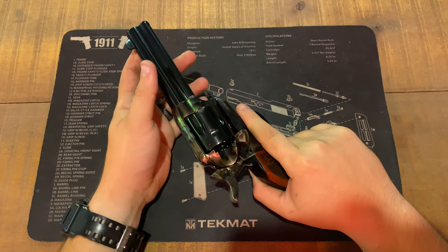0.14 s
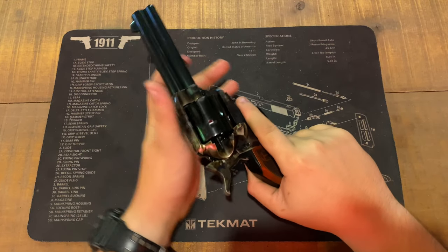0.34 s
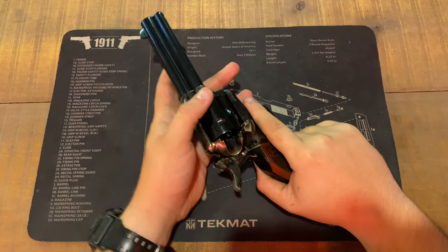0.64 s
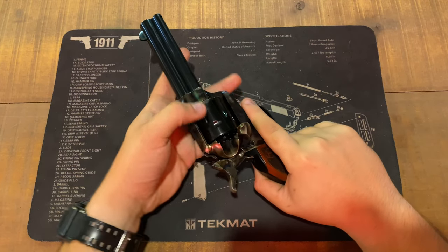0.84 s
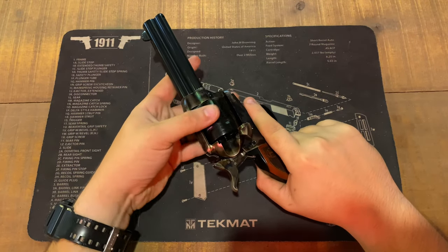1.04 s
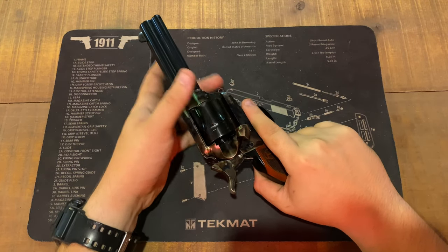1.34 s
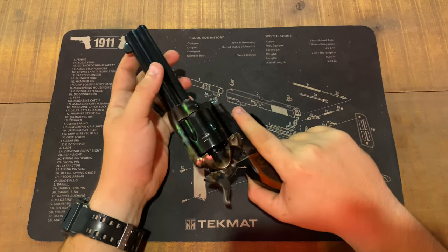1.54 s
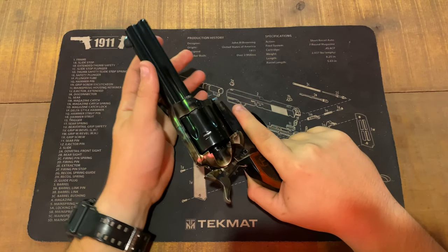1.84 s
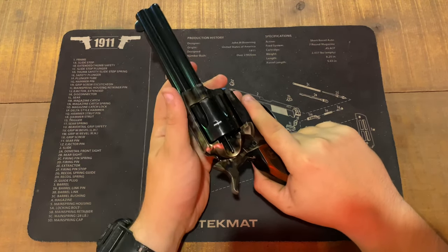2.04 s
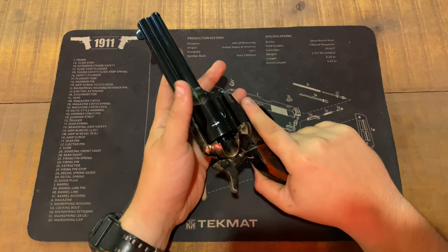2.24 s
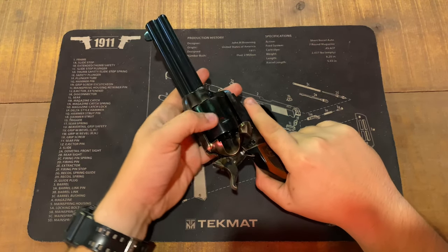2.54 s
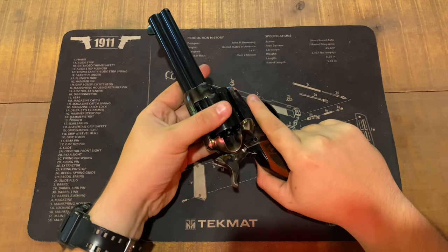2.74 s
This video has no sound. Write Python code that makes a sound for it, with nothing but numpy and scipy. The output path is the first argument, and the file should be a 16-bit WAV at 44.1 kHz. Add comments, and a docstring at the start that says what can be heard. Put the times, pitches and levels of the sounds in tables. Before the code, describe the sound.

Crisp metallic revolver clicks, close stereo microphone in a small room: faint scrape and ticks, hard ringing clack, a pause, one sharp snap, then the same again, with soft hand rubs and dull knocks over low rumble.

```python
"""A low room rumble comes first; over it a revolver is worked by hand above a table, twice in a row.
The cylinder scrapes free and swings out with light ticks, is pushed home with a ringing clack,
then is turned until its stop snaps into a notch. Hands rub the gun and take up dull knocks.
Contacts are coloured noise bursts, ringing steel is decaying sines, scrapes and rubs are shaped noise;
a small room echoes the gun."""
import sys
import numpy as np
from scipy import signal
from scipy.fft import rfft, irfft
from scipy.io import wavfile
from scipy.ndimage import uniform_filter1d

SR = 44100
rng = np.random.default_rng(int(sys.argv[2]) if len(sys.argv) > 2 else 0)


def to_wav(s):
    """Save 16-bit WAV."""
    ch = np.atleast_2d(s).T  # columns
    pcm = np.round(np.clip(ch, -1, 1) * 32767)  # PCM
    wavfile.write(sys.argv[1], SR, pcm.astype(np.int16))


N = 127890

# room rumble: (frequency [Hz], relative level [dB])
FLOOR_COLOUR = [(20, -12.5), (65, 3), (98, 0.5), (130, -11), (360, -15), (520, -27.5), (2000, -45.5),
                (6200, -35), (8000, -48), (10000, -48.5), (12000, -75)]
FLOOR_DB, FLOOR_PAN_DB = -59, [[4.5], [-2]]  # pan: left, right

# steel sliding on steel, one curve per scrape: (time [s], level [dB])
SCRAPE_CURVES = [
    [(.11, -105), (.145, -61), (.245, -54), (.275, -47), (.31, -46), (.325, -71)],
    [(.553, -55.5), (.56, -37), (.583, -40.5), (.62, -52.5), (.655, -47)],
    [(1.735, -66.5), (1.865, -50.5), (1.88, -45), (1.915, -34.5), (1.935, -67.5)],
    [(2.12, -46), (2.137, -40), (2.158, -41), (2.166, -33.5), (2.187, -36)],
]
# scrape spectrum: (frequency [Hz], relative level [dB])
SCRAPE_COLOUR = [(300, -31), (2650, -16), (5500, -10.5), (6200, -3), (8090, -18), (9490, -1), (11300, -22),
                 (12700, -58.5), (13600, -28), (16000, -40.5)]
GRAINS_PER_S = 3200
PATCH_HZ, PATCH_S, PATCH_DB = 601.4, 0.02, 4  # approximate width and life, rms depth of passing resonances

# light contacts of latch and crane: (time [s], level [dB], ping of the small parts re level [dB])
TICKS = [(0.141, -43.5, -0.5), (0.165, -40.5, -3), (0.315, -23.5, -8.5), (.404, -28.5, 5.5),
         (0.4058, -29, 12), (0.4104, -22, 5.5), (0.512, -35, -6.5), (0.5559, -30, 1), (0.586, -26.5, 2),
         (1.7723, -42.5, -18), (1.929, -25.5, -12.5), (1.9332, -17.5, 7), (1.9367, -18, 4.5),
         (2.0861, -29, 12), (2.121, -34.5, -10.5), (2.135, -32.5, 12.5), (2.1624, -30.5, 4)]
# tick spectrum: (frequency [Hz], relative level [dB])
TICK_COLOUR = [(800, -15.5), (2100, -8.5), (4700, -5.5), (6200, 0.5), (8000, -8.5), (10500, -5),
               (12500, -40.5), (14500, -26), (16500, -44.5)]
# ping spectrum of pins and springs: (frequency [Hz], relative level [dB])
PING_COLOUR = [(7000, -38), (8700, -12.5), (9250, -2.5), (9650, 6.5), (10000, -11), (12000, -45.5)]
# dull modes of the frame: (frequency [Hz], level [dB], T60 [s])
FRAME_MODES = [(1252, -7.5, 0.0068), (2578, 4.5, 0.025), (3212, -4.5, 0.031)]
FRAME_TICK_DB = -21  # re tick level

# the latch slips free and rings: (time [s], level [dB])
LATCH_RINGS = [(0.163, -41.5), (0.555, -35), (2.134, -32.5)]
LATCH_HZ, LATCH_T60_S = 6383, 0.054

# skin rubbing on the gun: (time [s], nominal length [s], level [dB], pitch of the cupped hand [Hz])
RUBS = [(0.265, 0.13, -44.5, 356.4), (0.409, 0.015, -41.5, 385), (0.595, 0.086, -46, 355),
        (1.888, 0.15, -52, 340), (2.082, .05, -54.5, 400), (2.358, 0.14, -44.5, 330)]
# rub spectrum: (frequency [Hz], relative level [dB])
RUB_COLOUR = [(60, -35), (160, -2), (340, -3.5), (600, -18), (2500, -38), (16000, -72.5)]
# rub balance: rows left, right; (gain [dB])
RUB_PAN_DB = [
    [1],
    [-1.5],
]
RUB_LUMP_S, RUB_LUMP_DB = 0.013, 5.5
RUB_PEAK_SHARE = 0.25  # peak time as a share of length
HOLLOW_WIDTH_HZ, HOLLOW_DB = 32, 2.5

# dull knocks through hands and table, before balance: (time [s], knock [dB], boom [dB])
KNOCKS = [(.29, -47.5, -35.5), (0.404, -45.5, -46.5), (0.655, -35, -41), (1.1, -46.5, -55.5),
          (1.94, -39.5, -35), (2.185, -37, -44)]
# knock balance: rows left, right; (gain [dB])
KNOCK_PAN_DB = [
    [5],
    [-7.5],
]
KNOCK_HZ, KNOCK_END_HZ, KNOCK_SAG_S, KNOCK_PEAK_S = 218.9, 50.5, 0.018, 0.027
KNOCK_ROUGH = 0.35  # share of noise
BOOM_HZ, BOOM_RISE_S, BOOM_T60_S = 96.1, 0.033, 0.54

# the cylinder slams home and chatters: (time [s], level [dB])
SLAMS = [(0.6555, -16.5), (0.6596, -8.5), (.662, -17.5), (2.185, -15), (2.1867, -6.5), (2.194, -21)]
# slam spectrum: (frequency [Hz], relative level [dB])
SLAM_COLOUR = [(300, -29), (1870, -20), (2520, -10), (3770, -16), (6140, -7), (7380, -6.5), (7890, -16.5),
               (9200, 2.5), (10800, -4.5), (11800, -41.5), (15400, -22), (16500, -71)]
# the frame clanks: (time [s], level re FRAME_MODES [dB])
CLANKS = [(.657, -33), (1.7692, -48), (2.1875, -28)]
# hardest contact of each closing: (time [s])
CLOSINGS_S = [.6595, 2.1873]
# cylinder modes: (frequency [Hz], level at first closing [dB], at second [dB], T60 [s])
CYLINDER_MODES = [(4950, -57.5, -38.5, 0.47), (5960, -30.5, -37, 0.11), (7350, -39.5, -28, 0.13),
                  (8670, -20.5, -17.5, 0.039), (8620, -42, -41, 0.24), (10100, -40, -40.5, 0.57),
                  (10640, -41.5, -45.5, 0.42), (13240, -58.5, -38, 0.099), (15030, -47, -49.5, .17)]

# the cylinder stop snaps in and bounces: (time [s], level [dB])
SNAPS = [(1.0869, -7), (1.0893, -10.5), (2.5828, -5.5), (2.592, -18)]
# snap spectrum: (frequency [Hz], relative level [dB])
SNAP_COLOUR = [(300, -34), (1400, -29.5), (2300, -21.5), (3350, -12.5), (4400, -15.5), (5000, -3.5),
               (5850, -1.5), (7800, -10.5), (9400, 5), (10500, -5.5), (12500, -33.5), (14800, -10.5),
               (16500, -32)]
# cylinder stop and its spring: (frequency [Hz], relative level [dB], T60 [s])
STOP_MODES = [(900, -19.5, 0.012), (1956, -18.5, 0.023), (2765, -5.5, 0.026), (5070, -6.5, 0.12),
              (5276, -17, 0.19), (5750, -13, 0.22), (5895, -13.5, 0.24), (6780, -12.5, 0.32),
              (9100, -6.5, .08), (9730, -7, 0.25)]
STOP_DB = -18  # re snap level

RISE_S = 0.00043  # all cracks and rings
TICK_DECAY_S, PING_DECAY_S, SLAM_DECAY_S, SNAP_DECAY_S = 0.0013, 0.00094, 0.0027, 0.0018
WAVER_HZ, WAVER_S = 26.06, 0.0068  # rms depth and pace of the waver in a ring
LIKENESS = 0.73  # left-right correlation of noise
RIGHT_LATE_S = 0.000204

# decay of the room: (frequency [Hz], T60 [s])
ROOM_T60 = [(300, 0.5), (6000, 0.55), (10000, 0.47), (15000, 0.18)]
# tail spectrum: (frequency [Hz], relative level [dB])
ROOM_COLOUR = [(200, 9.5), (1500, 1.5), (3500, 2), (6000, 4), (9500, -4), (11000, -1), (12500, -25),
               (16000, -5)]
ROOM_DB, EARLY_DB = -12.5, [[-3], [-4]]  # early: left, right
EARLY_DECAY_S, FIRST_ECHO_S = 0.013, 0.0016
EDGE_HZ = 16800


def amp(db):
    """Decibels to gain."""
    return 10 ** (np.asarray(db) / 20)


def unit(x):
    """Scales to rms 1."""
    return x / np.sqrt(np.mean(x ** 2) + 1e-20)


def read(points, hz):
    """Reads a table on a log-frequency axis."""
    f, value = np.transpose(points)
    return np.interp(np.log(hz + 1), np.log(f + 1), value)


def add(mix, start_s, sound):
    """Adds a sound to the mix at a time, cut at the end of the mix."""
    part = mix[:, max(round(start_s * SR), 0):][:, :sound.shape[-1]]
    part += sound[..., :part.shape[1]]


def colour(x, points, size=4096):
    """Minimum-phase filter of unit energy with the given spectrum."""
    gain_db = np.maximum(read(points, abs(np.fft.fftfreq(size, 1 / SR))), -100)
    log_gain = np.log(amp(gain_db))
    taps = np.fft.ifft(np.exp(np.conj(signal.hilbert(log_gain)))).real[:size // 2]
    taps /= np.linalg.norm(taps)
    return signal.oaconvolve(x, taps[None], axes=1)[:, :x.shape[1]]


def pair(size):
    """Partly alike left and right noise, each drawn with a flat spectrum."""
    a, b = irfft(np.exp(2j * np.pi * rng.random((2, size // 2 + 1))), size)
    return unit(np.array([a, LIKENESS * a + np.sqrt(1 - LIKENESS ** 2) * b]))


def crack(decay_s, size=2048, count=5):
    """One steel contact: countless short-lived modes, spread evenly over all pitches."""
    t = np.arange(size) / SR
    shape = (1 - np.exp(-t / RISE_S)) * np.exp(-t / decay_s)
    burst = pair(size) * shape
    for _ in range(count):
        # flatten the spectrum, then restore the envelope
        z = rfft(burst)
        burst = irfft(z / (abs(z) + 1e-12))
        power = abs(uniform_filter1d(burst ** 2, size=48))
        burst *= shape / np.sqrt(power + 1e-12)
    return burst


def ring(modes):
    """Lasting modes of a struck part; they waver and reach the two microphones a quarter cycle apart."""
    t = np.arange(SR // 2) / SR
    out = np.zeros((2, len(t)))
    apart = np.arange(2)[:, None] * np.pi / 2
    for hz, db, t60_s in modes:
        drift = unit(uniform_filter1d(rng.standard_normal(len(t)), max(int(WAVER_S * SR), 2)))
        turns = np.cumsum(hz + WAVER_HZ * drift) / SR + rng.random()
        out += amp(db - 60 * t / t60_s) * np.sin(2 * np.pi * turns + apart)
    return (1 - np.exp(-t / RISE_S)) * out


def room_rumble():
    """Steady noise weighted to the bass, stronger on the left."""
    noise = colour(pair(2 * N), FLOOR_COLOUR)[:, N:]  # drop the filter's onset
    return amp(FLOOR_DB) * amp(FLOOR_PAN_DB) * noise


def shifting(x, size=256):
    """As the point of contact moves, different resonances of the steel stand out for a moment."""
    z = signal.stft(x, nperseg=size)[2]
    bins = max(round(PATCH_HZ * size / SR), 1)
    frames = max(round(PATCH_S * SR * 2 / size), 1)
    field = uniform_filter1d(rng.standard_normal(z.shape[1:]), bins, axis=0)
    field = uniform_filter1d(field, frames, axis=1)
    gain = unit(amp(PATCH_DB * np.clip(unit(field), -2, 2)))
    return signal.istft(z * gain, nperseg=size)[1][:, :N]


def scrapes():
    """Sliding steel: dense tiny slips whose colour keeps changing."""
    t = np.arange(N) / SR
    level = np.zeros(N)
    for curve in SCRAPE_CURVES:
        level += amp(np.interp(t, *np.transpose(curve), left=-np.inf, right=-np.inf))
    slips = (rng.random(N) < GRAINS_PER_S / SR) * pair(N)
    return shifting(colour(unit(slips) * level, SCRAPE_COLOUR))


def ticks():
    """Light contacts: a small clank of the frame and a bright ping of pins and springs."""
    body, ping, clank = np.zeros((3, 2, N))
    for start_s, db, ping_db in TICKS:
        add(body, start_s, amp(db) * crack(TICK_DECAY_S))
        add(ping, start_s, amp(db + ping_db) * crack(PING_DECAY_S))
        add(clank, start_s, amp(db + FRAME_TICK_DB) * ring(FRAME_MODES))
    return colour(body, TICK_COLOUR) + colour(ping, PING_COLOUR) + clank


def latch_rings():
    """The freed latch rings in a single mode."""
    out = np.zeros((2, N))
    for start_s, db in LATCH_RINGS:
        add(out, start_s, ring([(LATCH_HZ, db, LATCH_T60_S)]))
    return out


def lumps(length_s, depth_db):
    """Uneven grip: a gain that jumps about at random."""
    wander = unit(uniform_filter1d(rng.standard_normal(N), max(int(length_s * SR), 2)))
    return amp(depth_db * np.clip(wander, -2, 2))


def rubs():
    """Fingers shift their hold in short, soft, lumpy swells that sound the hollow of the hand."""
    out = np.zeros((2, N))
    for start_s, length_s, db, hz in RUBS:
        u = np.arange(SR // 2) / SR / (length_s * RUB_PEAK_SHARE)
        swell = (u * np.exp(1 - u)) ** 2
        friction = unit(pair(N) * lumps(RUB_LUMP_S, RUB_LUMP_DB))[:, :len(u)]
        rub = colour(friction * swell, RUB_COLOUR)
        hollow = signal.lfilter(*signal.iirpeak(hz, hz / HOLLOW_WIDTH_HZ, fs=SR), rub)
        add(out, start_s, amp(db) * (rub + amp(HOLLOW_DB) * hollow))
    return out * amp(RUB_PAN_DB)


def knocks():
    """A dull, uneven knock that sinks in pitch, and the low boom that it leaves."""
    out, t = np.zeros((2, N)), np.arange(SR) / SR
    hz = KNOCK_END_HZ + (KNOCK_HZ - KNOCK_END_HZ) * np.exp(-t / KNOCK_SAG_S)
    tone = np.sin(2 * np.pi * np.cumsum(hz) / SR)
    u = (t / KNOCK_PEAK_S) ** 2
    swell = u * np.exp(1 - u)
    boom_shape = (1 - np.exp(-t / BOOM_RISE_S)) * np.exp(-np.log(1000) * t / BOOM_T60_S)
    boom = boom_shape * np.sin(2 * np.pi * BOOM_HZ * t)
    low_pass = signal.butter(3, KNOCK_HZ, fs=SR, output="sos")
    for start_s, knock_db, boom_db in KNOCKS:
        rumble = unit(signal.sosfilt(low_pass, pair(SR)))
        knock = swell * (tone + KNOCK_ROUGH * rumble)
        add(out, start_s, amp(knock_db) * knock + amp(boom_db) * boom)
    return out * amp(KNOCK_PAN_DB)


def slams():
    """The cylinder hits home in a quick chatter of contacts."""
    body = np.zeros((2, N))
    for start_s, db in SLAMS:
        add(body, start_s, amp(db) * crack(SLAM_DECAY_S))
    return colour(body, SLAM_COLOUR)


def frame_clanks():
    """The struck frame sounds a few quickly damped modes."""
    out = np.zeros((2, N))
    for start_s, db in CLANKS:
        add(out, start_s, amp(db) * ring(FRAME_MODES))
    return out


def cylinder_rings():
    """The cylinder rings on, its modes excited differently at each closing."""
    out = np.zeros((2, N))
    hz, *closings_db, t60_s = np.transpose(CYLINDER_MODES)
    for start_s, db in zip(CLOSINGS_S, closings_db):
        add(out, start_s, ring(zip(hz, db, t60_s)))
    return out


def snaps():
    """The sprung stop drops into its notch: a crack plus the modes of stop and spring."""
    body, tone = np.zeros((2, 2, N))
    for start_s, db in SNAPS:
        add(body, start_s, amp(db) * crack(SNAP_DECAY_S))
        add(tone, start_s, amp(db + STOP_DB) * ring(STOP_MODES))
    return colour(body, SNAP_COLOUR) + tone


def placed(x, late_s):
    """The sound reaches the right microphone a little later."""
    delay = np.exp(-2j * np.pi * np.fft.rfftfreq(N, 1 / SR) * late_s)
    return np.array([x[0], irfft(rfft(x[1]) * delay, N)])


def room(x):
    """Quick echoes from table and hands, then the tail of a small room."""
    t = np.arange(SR) / SR
    hz, when_s, z = signal.stft(rng.standard_normal((2, SR)), SR, nperseg=256)
    decay = np.exp(-np.log(1000) * when_s / read(ROOM_T60, hz)[:, None])
    z = z * decay * amp(read(ROOM_COLOUR, hz))[:, None]
    tail = signal.istft(z, SR, nperseg=256)[1][:, :SR] * np.clip(t / FIRST_ECHO_S - 1, 0, 1)
    sparse = rng.standard_normal((2, SR)) * (rng.random((2, SR)) < 0.1)
    early = sparse * (t > FIRST_ECHO_S) * np.exp(-t / EARLY_DECAY_S)
    echoes = np.zeros((2, SR))
    for db, response in [(ROOM_DB, tail), (EARLY_DB, early)]:
        echoes += amp(db) * response / np.linalg.norm(response, axis=1, keepdims=True)
    return signal.fftconvolve(x, echoes, axes=1)[:, :N]


def scene():
    """The gun in its room, with knocks and rumble; scrapes, ticks, rubs and slams lead on the left."""
    gun = placed(scrapes() + ticks() + rubs() + slams(), RIGHT_LATE_S)
    gun += latch_rings() + frame_clanks() + cylinder_rings() + snaps()
    return room_rumble() + gun + room(gun) + knocks()


def record(dry):
    """The recorder's band limit: a steep low-pass."""
    taps = signal.firwin(511, EDGE_HZ, window=("kaiser", 9), fs=SR)
    return signal.oaconvolve(dry, taps[None], "same")


dry = scene()
out = record(dry)
to_wav(out)
```